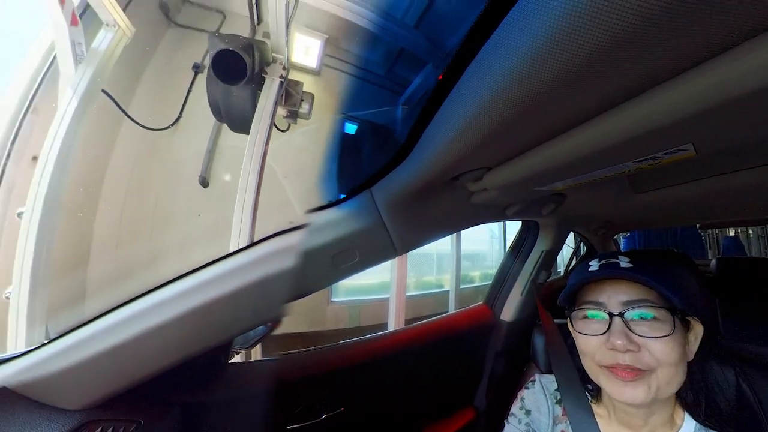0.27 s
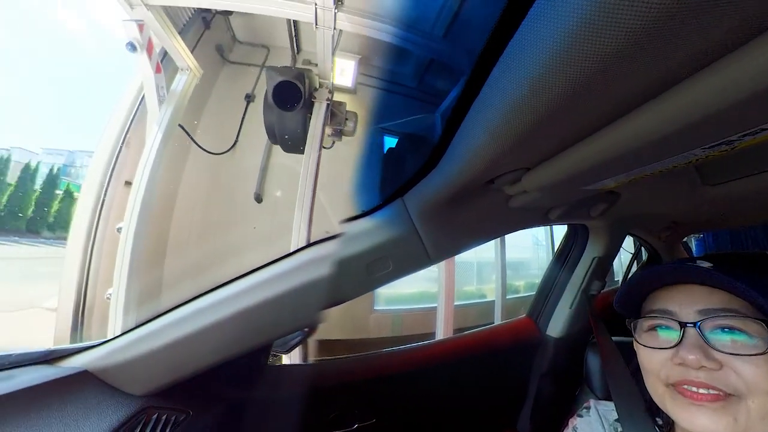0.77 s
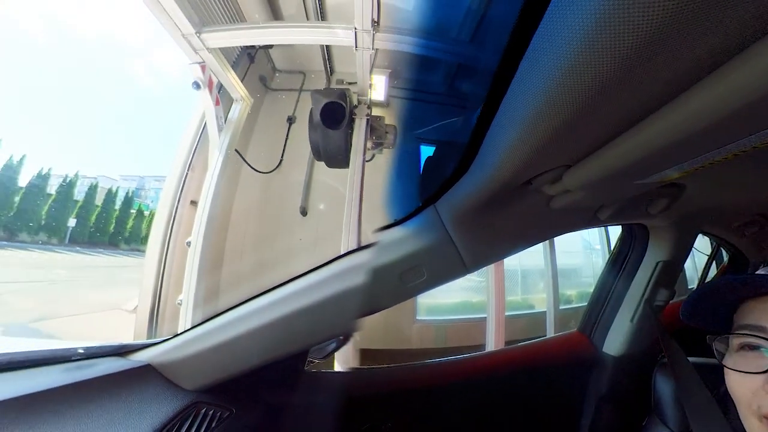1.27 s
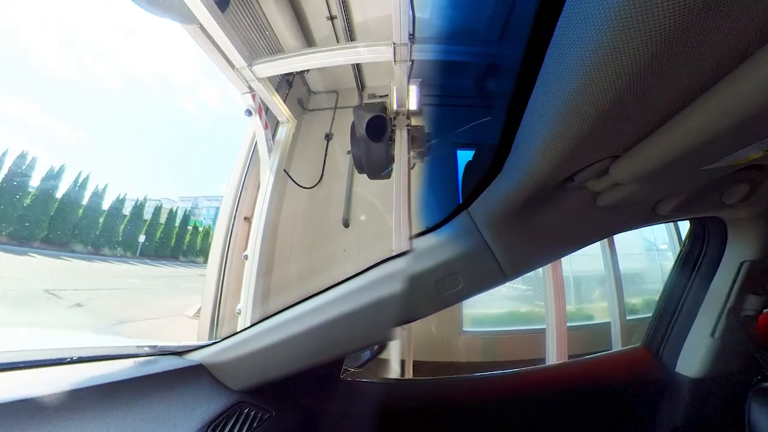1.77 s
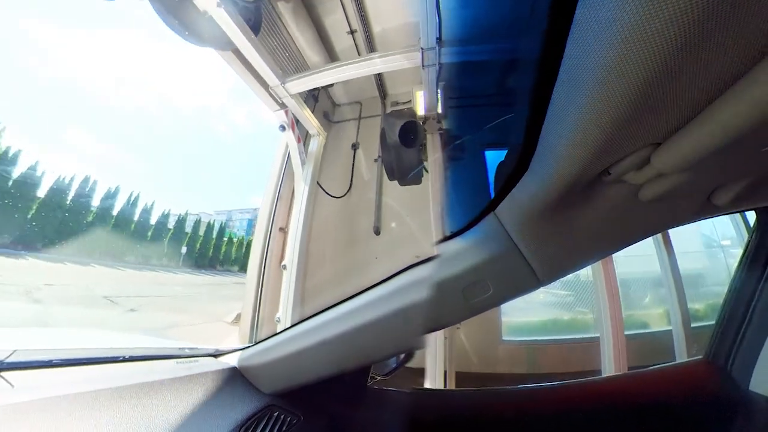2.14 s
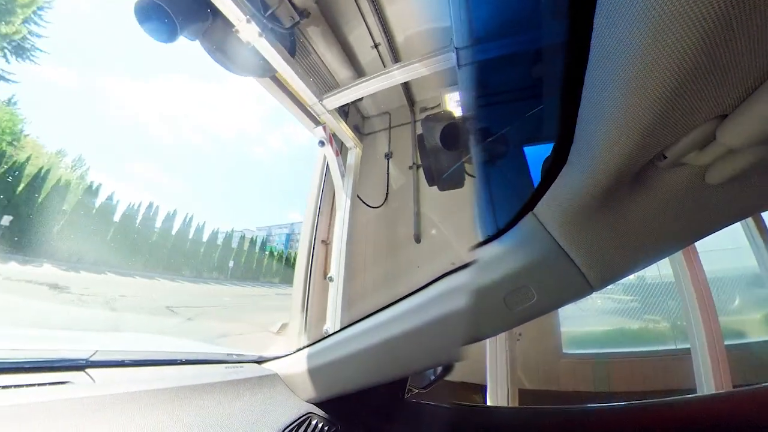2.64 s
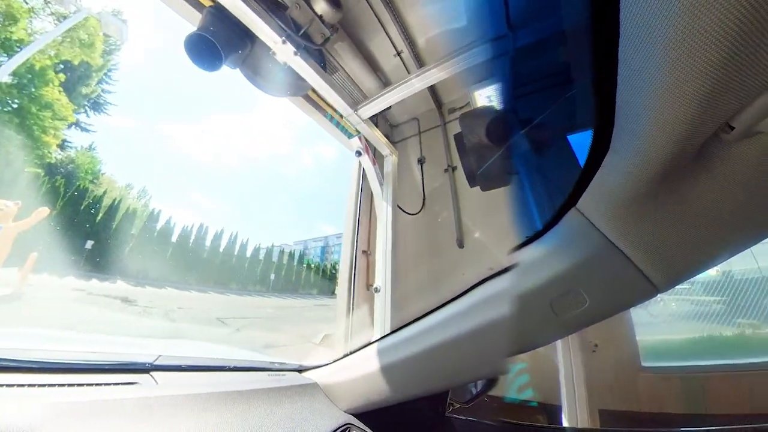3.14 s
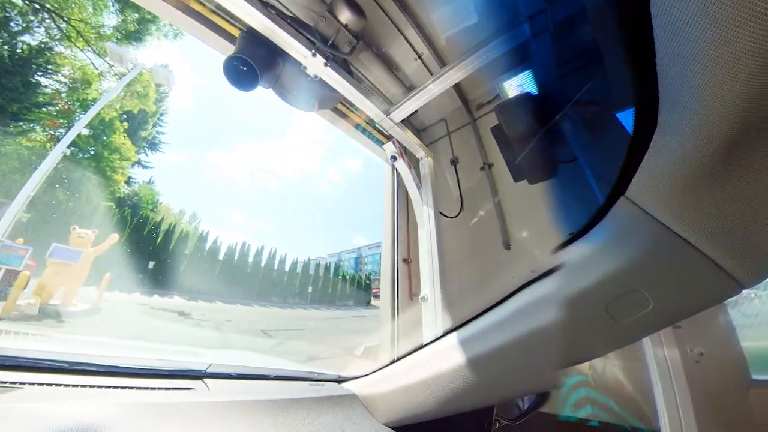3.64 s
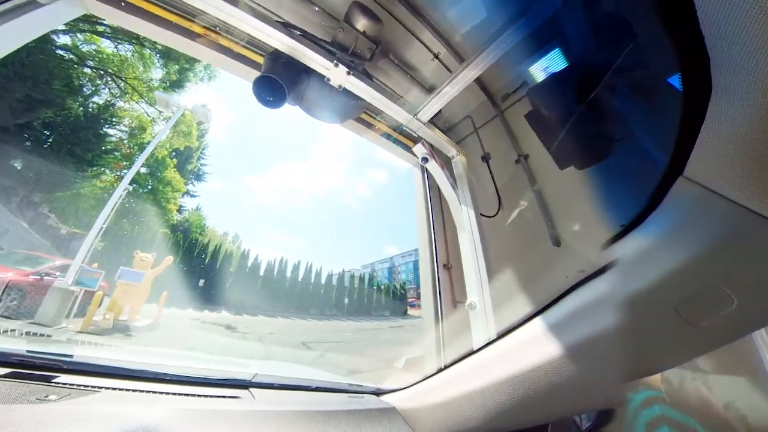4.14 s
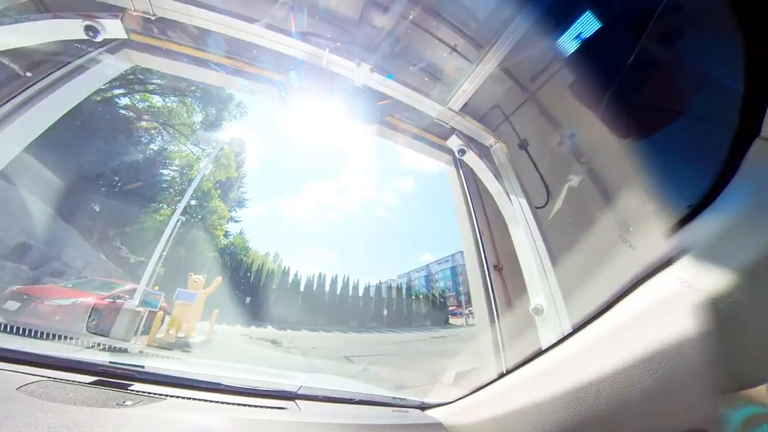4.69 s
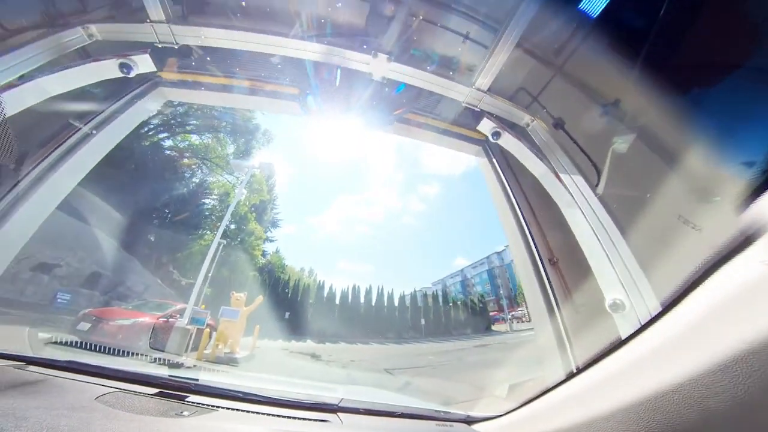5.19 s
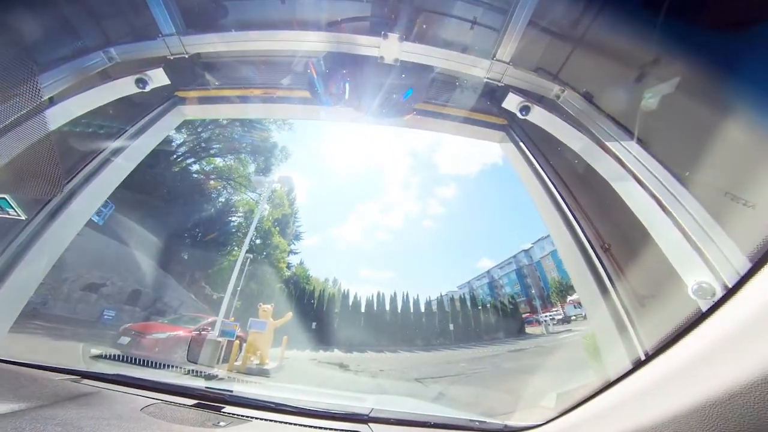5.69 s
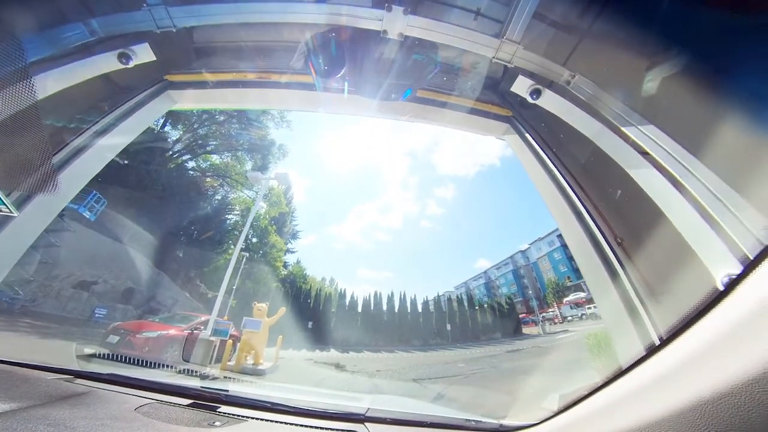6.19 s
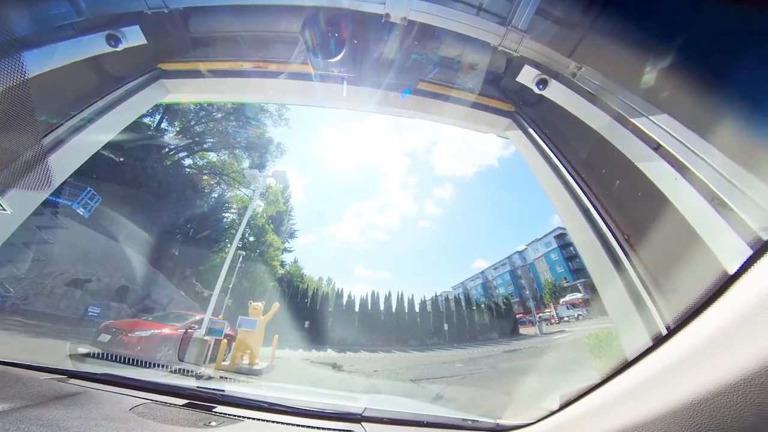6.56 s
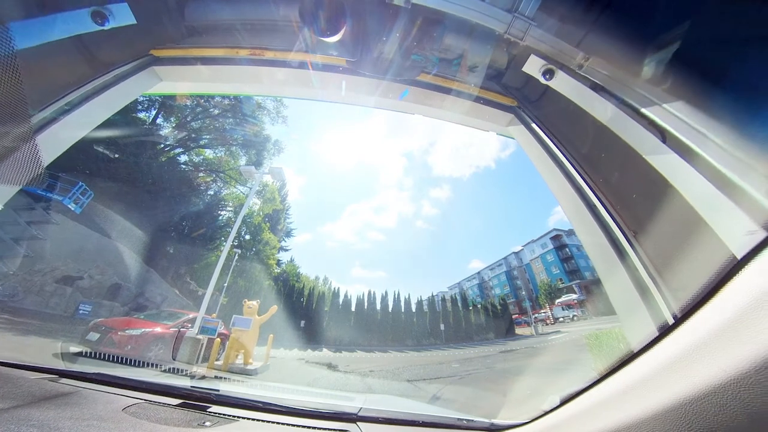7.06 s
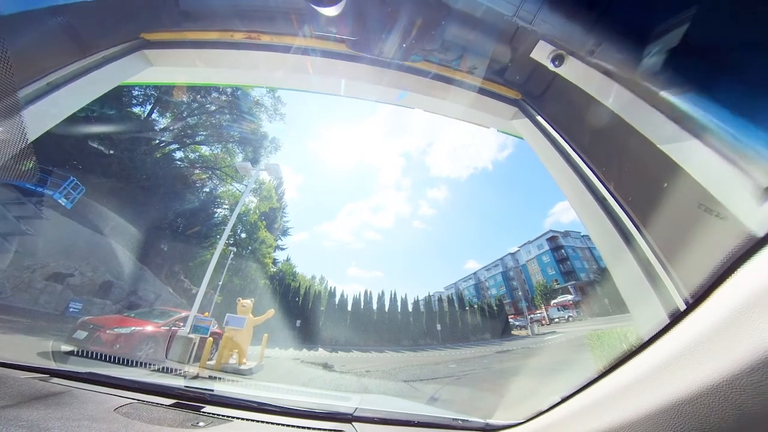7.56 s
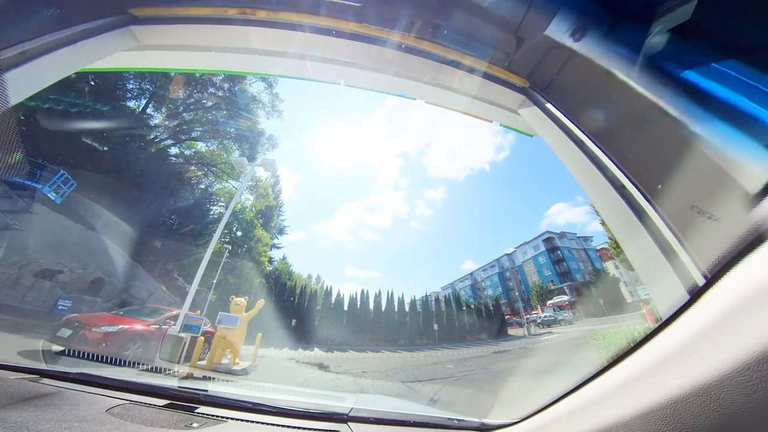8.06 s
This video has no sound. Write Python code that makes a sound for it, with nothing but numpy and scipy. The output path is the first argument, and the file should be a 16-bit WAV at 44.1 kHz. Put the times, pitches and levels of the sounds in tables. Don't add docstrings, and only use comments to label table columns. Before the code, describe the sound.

Deep, unsteady booming and a dulled roar fill a closed car cabin while powerful dryer blowers blast the roof, with faint air hiss past the seals.

```python
import sys
import numpy as np
from scipy import signal
from scipy.io import wavfile
from scipy.ndimage import uniform_filter1d

SR = 44100
rng = np.random.default_rng(int(sys.argv[2]) if len(sys.argv) > 2 else 0)


def to_wav(sig):
    pcm = np.clip(np.atleast_2d(sig), -1, 1) * 32767
    pcm = np.round(pcm).astype(np.int16)
    wavfile.write(sys.argv[1], SR, pcm.T)


def invert_db(x):
    u = np.asarray(x, float) / 20
    return 10 ** u


N = 367353

# time in seconds, forward from the rear (0-1),
# toward the side glass (0-1).
CAMERA_PATH = [(0, 0.3, 0.05), (1.6, 0.3, 0.03), (2.3, 0, 0.4), (2.8, 0.04, 0.35), (3.3, 0.2, 0.7),
               (3.9, 0.7, 0.97), (4.5, .85, 1), (5.2, .8, 0.9), (5.7, .95, 0.93), (6.2, 1.01, 0.7),
               (6.8, 0.8, .6), (7.2, 0.5, 0.4), (7.6, 0.4, 0.3), (8.0, 0.7, 0.3), (8.33, 0.6, 0)]


def evened(x):
    return x / np.sqrt(np.mean(x ** 2) + 1e-20)


def read(points, hz):
    f, value = np.transpose(points)
    return np.interp(np.log(hz + 1), np.log(f + 1), value)


def curves(rows):
    s, *columns = np.transpose(rows)
    return [np.interp(np.arange(N) / SR, s, c) for c in columns]


def drift(top_hz):
    t = np.arange(0, N + 256, 256) / SR
    slow = np.zeros(len(t))
    for f in np.geomspace(top_hz / 20, top_hz, num=24):
        slow += np.sin(2 * np.pi * (f * t + rng.random())) / np.sqrt(f)
    return np.interp(np.arange(N) / SR, t, evened(slow))


def resonate(x, hz, width):
    turn = np.exp(2j * np.pi * np.cumsum(hz * np.ones(N)) / SR)
    r = np.exp(-np.pi * width / SR)
    return 2 * (turn * signal.lfilter([1 - r], [1, -r], x / turn)).real


def ringing(push, hz, width):
    return evened(resonate(resonate(push, hz, width), hz, width))


def turbulence(spectrum, patchy_db, size):
    frames = 4 * N // size + 8
    hz = np.fft.rfftfreq(size, 1 / SR)
    a, b, patches = rng.standard_normal((frames, len(hz), 3)).T
    patches = uniform_filter1d(patches, size=5, axis=0)
    patches = evened(uniform_filter1d(patches, size=9, axis=1))
    z = (a + 1j * b) * invert_db(read(spectrum, hz)[:, None] + patchy_db * patches)
    air = signal.istft(z, nperseg=size, noverlap=3 * size // 4)[1]
    return evened(air[size:size + N])


def booms():
    # width in Hz, level in dB, width of the tight core in Hz, core level in dB.
    boom_modes = [
        (25, -5, 16, -10),
        (61.4, -2, 41, -14),
        (61.4, -3, 36, -8),
    ]
    # time in seconds, level in dB.
    roof_load = [(0, -24.5), (1.1, -24.5), (1.9, -24.5), (2.8, -37.5), (3.8, -24.5), (4.8, -36),
                 (5.5, -26.5), (6.5, -25.5), (7.6, -20), (8.33, -33.5)]
    forward, side = curves(CAMERA_PATH)
    t = np.arange(N) / SR
    levels_db = (curves(roof_load)[0], -21 - 6 * forward, -30.5 + 9 * side)
    peaks_hz = (39.6 + 1 * t, 101.8 + 21.2 * forward, 161.3 + 20.2 * side + 12.6 * forward)
    core_wander = 0.06
    out = np.zeros(N)
    for (width, db, core_width, core_db), level_db, hz in zip(boom_modes, levels_db, peaks_hz):
        hz = hz * (1 + .04 * drift(4.5))
        broad = ringing(rng.standard_normal(N), hz, width)
        core_hz = hz * (1.037 + core_wander * drift(1.5))
        core = ringing(rng.standard_normal(N), core_hz, core_width)
        out += invert_db(level_db + db) * (broad + invert_db(core_db) * core)
    return out


def roar():
    # frequency in Hz, level in dB per Hz.
    panels = [(20, -20), (40, -2), (100, 2), (150, -2.5), (250, -3.5), (330, -3.5), (500, -9.5),
              (700, -15.5), (1000, -23), (1500, -29.5), (2100, -39), (3000, -47.5), (4500, -66.5),
              (7000, -84)]
    # frequency in Hz, width in Hz, level in dB, change toward the side glass in dB.
    panel_rings = [(237.4, 20, -15.5, -5), (438, 90, -18, 3), (480.9, 25, -22.5, 2.5), (588, 38, -28, -0.5),
                   (712, 19, -25, -10), (760.6, 130, -30, 3), (828, 34, -29, -10.5), (955, 27, -31.5, -1)]
    through = turbulence(panels, patchy_db=-0.58, size=2048)
    forward, side = curves(CAMERA_PATH)
    for hz, width, db, side_db in panel_rings:
        push = rng.standard_normal(N) * invert_db(1.0 * drift(1.6))
        through = through + invert_db(db + side_db * side) * ringing(push, hz, width)
    return invert_db(-30.5 + 1.5 * forward - 1.9 * side + 5.5) * through


def hiss():
    # frequency in Hz, level in dB per Hz.
    seals = [(1500, -18.5), (2600, 1), (3100, -2), (3600, .6), (4000, -3), (4600, -5.5), (4900, -4),
             (5250, -2), (5900, -5), (6800, -8.5), (7500, -15.5), (8100, -23), (9000, -38), (10400, -54),
             (14000, -82)]
    # frequency in Hz, width in Hz.
    leaks = [
        (5060, 350),
        (4460, 930),
        (5400, 600),
    ]
    forward, side = curves(CAMERA_PATH)
    t = np.arange(N) / SR
    rush = invert_db(-1.5 + 0.5 * drift(60)) * turbulence(seals, patchy_db=2.5, size=256)
    whistle, rear, glass = [ringing(rng.standard_normal(N), hz, width) for hz, width in leaks]
    singing = invert_db(-10.5 - 10.0 * t) * whistle
    singing += invert_db(-15 - 9.0 * forward) * rear
    singing += invert_db(-22.5 + 9.0 * side) * glass
    start_db, settle_s = 5.5, 1
    return invert_db(-62 + 0.8 * side + start_db * np.exp(-t / settle_s)) * (rush + singing)


def ticks():
    # start in seconds, peak level in dB.
    finger_clicks = [(1.8944, -63), (1.9214, -68), (1.9929, -57), (2.0464, -60), (2.0877, -59),
                     (2.1040, -65)]
    t = np.arange(300) / SR
    out = np.zeros(N + 300)
    for s, db in finger_clicks:
        start = round(s * SR)
        out[start:start + len(t)] += invert_db(db - 60 * t / .012) * rng.standard_normal(len(t))
    case = signal.butter(2, [5500, 8800], "band", fs=SR, output="sos")
    return signal.sosfilt(case, out[:N])


def scene():
    return (booms() + roar() + hiss() + ticks())[None]


def roll_off(x):
    return signal.sosfilt(signal.butter(12, 15760, fs=SR, output="sos"), x)


def record(dry):
    x = signal.sosfilt(signal.butter(4, 32, "high", fs=SR, output="sos"), dry)
    x = x * np.minimum(.1 + np.arange(N) / 300, 1)
    power_db = 10 * np.log10(abs(uniform_filter1d(x ** 2, size=500, axis=1)) + 1e-12)
    over_db = np.maximum(power_db + 18, 0)
    x = x * invert_db(1.1 - 0.58 * uniform_filter1d(over_db, size=400, axis=1))
    x = signal.sosfilt(signal.cheby2(14, 40, 9500, fs=SR, output="sos"), x)
    sampling_hz = 16000
    bass = signal.lfilter([.06], [1, -.955], x)
    mirror = np.cos(2 * np.pi * sampling_hz * np.arange(N) / SR)
    image = invert_db(-64 + 5 * drift(40)) * bass * mirror
    return roll_off(x + image)


dry = scene()
out = record(dry)
to_wav(out)
```